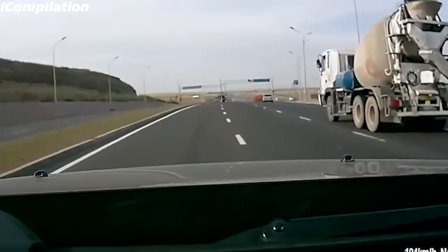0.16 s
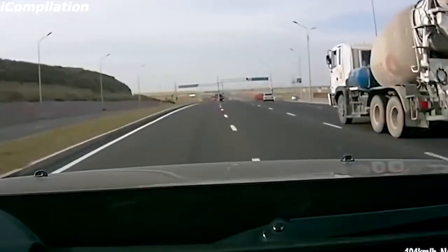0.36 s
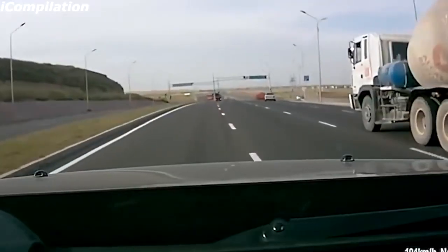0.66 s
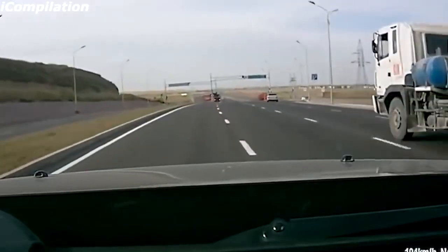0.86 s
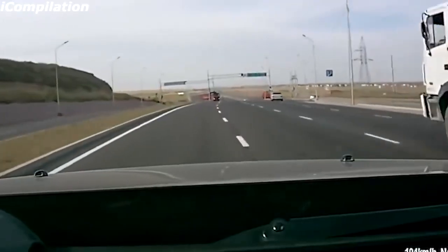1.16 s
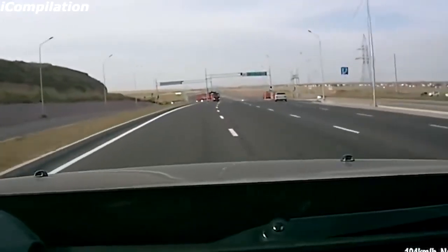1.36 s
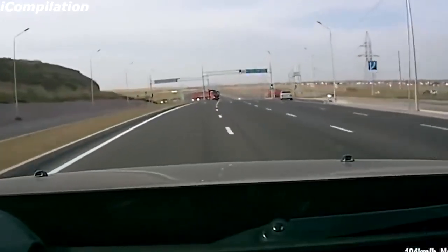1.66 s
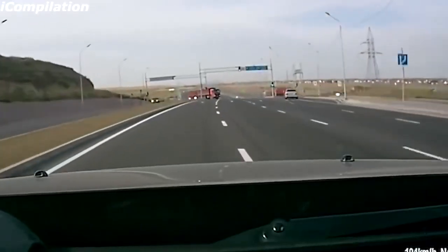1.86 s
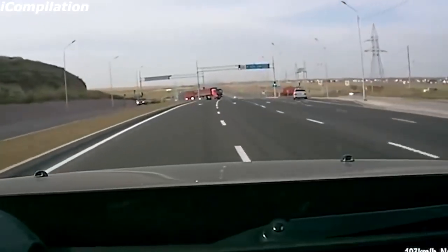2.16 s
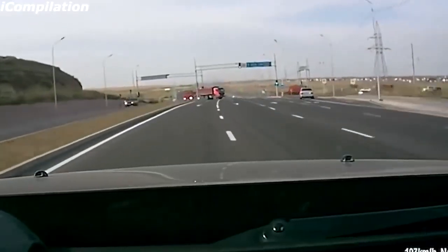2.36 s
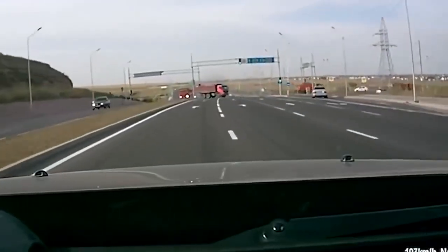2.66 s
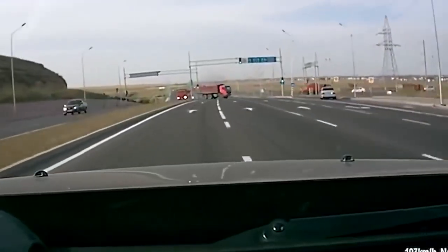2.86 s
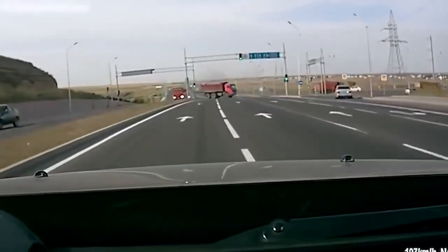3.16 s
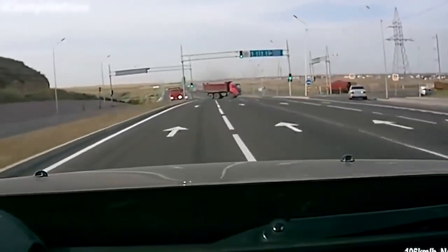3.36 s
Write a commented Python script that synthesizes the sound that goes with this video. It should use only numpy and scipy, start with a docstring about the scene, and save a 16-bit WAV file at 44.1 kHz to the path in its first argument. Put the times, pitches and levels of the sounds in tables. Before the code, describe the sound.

Wind buffets a fast car's cabin with a low, fluttering throb and tyre roar.

```python
"""Inside a car at highway speed. Air rushing past makes the cabin throb about fifteen times a second,
over a faint engine drone, the rumble of the body, the roar of the tyres and gusts of wind hiss.
The throb is a deep swinging tone; road and wind are bands of noise that pump in time with it.
It overloads a small recorder: the limiter ducks and the tallest swings are cut flat, so the noise
flutters."""
import sys
import numpy as np
from scipy import signal
from scipy.fft import rfft, irfft
from scipy.io import wavfile
from scipy.ndimage import uniform_filter1d

SR = 44100
rng = np.random.default_rng(int(sys.argv[2]) if len(sys.argv) > 2 else 0)


def generate_wav(signal):
    """Clip the signal to [-1, 1] and save it as 16-bit WAV at the path in sys.argv[1]."""
    frames = np.transpose(np.atleast_2d(signal))
    scaled = np.clip(frames, -1, 1) * 32767
    pcm = np.round(scaled).astype(np.int16)
    wavfile.write(sys.argv[1], SR, pcm)


N = 154350
T = np.arange(N) / SR

# slaps of air that swell one swing of the throb, with a brief rise or dip in the hiss just before:
# (time [s], swell [dB], swell width [s], rise or dip in the hiss [dB])
SLAPS = [(0.843, 6.5, 0.0048, 7), (0.938, 6.5, 0.0048, 2), (1.05, 6, 0.0041, 1), (1.083, 9, 0.0018, 6),
         (1.342, 9, 0.0033, 2), (1.3721, 14, 0.0022, 8), (1.419, 8, 0.0027, 8.5),
         (1.692, 10.5, 0.0043, 9.5), (1.719, 7, 0.0043, 6.5), (1.8218, 5, 0.0034, -4),
         (2.9345, 14.5, 0.003, 4), (3.066, 5, .0043, -7)]


def from_db(db):
    """Decibels to gain."""
    return 10 ** (np.asarray(db) / 20)


def rms_one(x):
    """Scale to unit rms."""
    return x / np.sqrt(np.mean(x ** 2) + 1e-20)


def in_time(rows):
    """An automation curve: (time [s], value) rows joined by straight lines."""
    return np.interp(T, *np.transpose(rows))


def pulses(times, heights, widths):
    """Smooth bumps at the given moments."""
    return sum(h * np.exp(-.5 * ((T - s) / w) ** 2) for s, h, w in zip(times, heights, widths))


def drift(rate_hz):
    """Smooth random wander of spread 1."""
    hop, run_in = 40, 2000
    pole = np.exp(-2 * np.pi * rate_hz * hop / SR)
    white = rng.standard_normal(N // hop + run_in + 2)
    slow = signal.lfilter([1], [1, -2 * pole, pole * pole], white)[run_in:]
    return np.interp(np.arange(N) / hop, np.arange(len(slow)), rms_one(slow))


def noise(spectrum):
    """Unit-rms noise with the given spectrum, falling steeply beyond its ends."""
    hz, db = np.transpose(spectrum)
    f = np.maximum(np.arange(N // 2 + 1) * SR / N, 1)
    skirts = np.minimum(f / hz[0], 1) ** 2 * np.minimum(hz[-1] / f, 1) ** 2
    colour = from_db(np.interp(np.log(f), np.log(hz), db))
    return rms_one(irfft(rfft(rng.standard_normal(N)) * skirts * colour, N))


def turbulent(spectrum, level_db, flutter_db, flutter_hz):
    """Coloured noise, evened out over 70 ms, riding a level curve with a flutter of its own."""
    x = noise(spectrum)
    steady = x / np.sqrt(uniform_filter1d(x ** 2, int(0.07 * SR)) + 1e-12)
    return steady * from_db(level_db + flutter_db * drift(flutter_hz))


def throb_angle():
    """Where the cabin air is in its swing, in radians."""
    # pace of the throb: (time [s], rate [Hz])
    throb_rate = [(0.0, 14.82), (0.2, 15.2), (0.4, 16.69), (0.55, 16.3), (0.7, 15.58), (0.85, 15.45),
                  (1.0, 13.26), (1.15, 15.27), (1.3, 15.73), (1.45, 15.96), (1.6, 13.84), (1.75, 13.96),
                  (1.9, 14.24), (2.05, 14.35), (2.2, 15.5), (2.4, 14.75), (2.6, 15.8), (2.75, 16.43),
                  (2.9, 15.83), (3.1, 14.62), (3.3, 16.03), (3.5, 16.28)]
    return 2 * np.pi * np.cumsum(in_time(throb_rate)) / SR


def cabin_throb():
    """The cabin air swings as one large, slightly overdriven resonator."""
    # strength of the throb, collapsing where a gust breaks it up: (time [s], relative level [dB])
    throb_level = [(0, -49), (.12, -28), (.24, -21.5), (.35, -27), (.46, -19.5), (.6, -17.5), (.68, -26),
                   (.79, -20), (1.15, -17), (1.3, -20), (1.48, -16), (1.53, -29), (1.62, -23),
                   (1.69, -18.5), (1.9, -17), (2.05, -20.5), (2.55, -17), (3.0, -16.5), (3.33, -16),
                   (3.45, -32)]
    trim_db, third_harmonic_db = -0.16, -27
    angle = throb_angle()
    times, swell_db, widths, _ = np.transpose(SLAPS)
    swing = np.sqrt(2) * (np.sin(angle) - from_db(third_harmonic_db) * np.cos(3 * angle))
    return swing * from_db(in_time(throb_level) + trim_db + pulses(times, swell_db, widths))


def engine(firing_hz=78.44, wander_hz=0.5, level_db=-38.5):
    """A faint, nearly steady firing drone."""
    hz = firing_hz + wander_hz * drift(0.61)
    return from_db(level_db) * np.sqrt(2) * np.sin(2 * np.pi * np.cumsum(hz) / SR)


def body_rumble(trim_db=3.5, gust_share=0.15):
    """The car body rumbles deep down, nudged by the gusts."""
    # colour of the rumble: (frequency [Hz], relative level [dB])
    rumble_spectrum = [(8, -17.5), (24, -5), (33, -2.5), (38, -4), (48, 3), (60, -10), (85, -13.5),
                       (120, -17.5), (200, -33)]
    # swells of the rumble: (time [s], relative level [dB])
    rumble_level = [(0, -35), (0.26, -32.5), (0.33, -23), (0.45, -23.5), (0.5, -27.5), (0.58, -29),
                    (0.64, -26.5), (0.75, -24), (0.95, -29.5), (1.1, -23), (1.2, -33.5), (1.35, -26.5),
                    (1.48, -29), (1.55, -20.5), (1.64, -25.5), (1.76, -30.5), (1.96, -30.5), (2.03, -26),
                    (2.45, -28.5), (2.9, -31), (3.15, -31), (3.32, -32.5), (3.39, -24.5), (3.5, -29.5)]
    roar_gust_db, _, _ = gusts_db()
    level_db = in_time(rumble_level) + gust_share * roar_gust_db + trim_db
    return turbulent(rumble_spectrum, level_db, flutter_db=1.3, flutter_hz=35)


def tyres(roar_trim_db=1.5, tread_trim_db=-6.5):
    """Tyres roar on the road, and the tread's band near 1 kHz follows most of each swell."""
    # colour of the road roar: (frequency [Hz], relative level [dB])
    roar_spectrum = [(80, -10), (130, -2.5), (165, 0), (200, 1.5), (290, -0.5), (350, -6.5), (420, -8.5),
                     (480, -7.5), (630, -13), (780, -27.5), (1400, -27), (3000, -38)]
    # colour of the tread: (frequency [Hz], relative level [dB])
    tread_spectrum = [(600, -24), (790, -9.5), (870, -2), (970, 1), (1035, -1), (1105, 2.5), (1200, -4),
                      (1310, -5), (1500, -14.5), (2200, -24.5), (4000, -49)]
    # swells of the road and air roar: (time [s], relative level [dB])
    roar_level = [(0, -45), (0.18, -37.5), (0.28, -41.5), (0.35, -32), (0.46, -38.5), (0.54, -33.5),
                  (0.65, -36.5), (0.7, -33.5), (0.79, -31.5), (0.88, -37.5), (1.0, -36.5), (1.1, -35.5),
                  (1.2, -36.5), (1.48, -35.5), (1.53, -33.5), (1.62, -30.5), (1.71, -38.5), (1.82, -34),
                  (2.02, -35.5), (2.07, -29), (2.22, -36.5), (2.46, -34.5), (2.56, -35.5), (2.66, -39),
                  (2.82, -36), (2.92, -40.5), (3.17, -40.5), (3.33, -34.5), (3.44, -31), (3.5, -31.5)]
    follow_share, pivot_db = 0.84, -33
    roar_db = in_time(roar_level)
    roar_gust_db, tread_gust_db, _ = gusts_db()
    roar = turbulent(roar_spectrum, roar_db + roar_gust_db + roar_trim_db, flutter_db=0.8, flutter_hz=28)
    tread_db = pivot_db + follow_share * (roar_db - pivot_db) + tread_gust_db
    tread = turbulent(tread_spectrum, tread_db + tread_trim_db, flutter_db=1.43, flutter_hz=7.2)
    return roar + tread


def wind(rush_trim_db=11, hiss_trim_db=1):
    """Air tears past the windows as a rush and a thin hiss; both briefly rise or dip before a slap."""
    # colour of the rush: (frequency [Hz], relative level [dB])
    rush_spectrum = [(600, 7.5), (1400, -3), (1600, -4), (1800, 2.5), (2050, -2), (2250, 0), (2500, -4),
                     (2850, -4), (3300, -8.5), (3800, -26.5), (6000, -65)]
    # colour of the hiss: (frequency [Hz], relative level [dB])
    hiss_spectrum = [(1500, 0.5), (3600, -1.5), (4900, 0.5), (5500, 3.5), (6050, 1.5), (6800, -1.5),
                     (8500, 1.5), (10000, -1), (12200, -7), (13500, -15), (14500, -27), (16000, -27)]
    # swells of the airflow: (time [s], relative level [dB])
    flow_level = [(0, -69), (0.27, -65.5), (0.35, -60.5), (0.46, -64), (0.64, -60), (0.7, -60), (0.81, -59),
                  (0.87, -63), (1.1, -61), (1.46, -62.5), (1.6, -57), (1.71, -63.5), (1.83, -58),
                  (2.0, -56.5), (2.09, -49.5), (2.16, -52), (2.22, -54), (2.46, -55.5), (2.56, -58.5),
                  (2.83, -60), (2.92, -64), (3.17, -63), (3.34, -60), (3.45, -56.5), (3.5, -59)]
    flick_lead_s, flick_width_s, rush_flick_scale = 0.0067, 0.0025, 1.68
    times, _, _, flick_heights = np.transpose(SLAPS)
    flicks_db = pulses(times - flick_lead_s, flick_heights, np.full(len(times), flick_width_s))
    _, _, wind_gust_db = gusts_db()
    flow_db = in_time(flow_level) + wind_gust_db
    rush_db = flow_db + rush_flick_scale * flicks_db + rush_trim_db
    rush = turbulent(rush_spectrum, rush_db, flutter_db=1.24, flutter_hz=18)
    hiss = turbulent(hiss_spectrum, flow_db + flicks_db + hiss_trim_db, flutter_db=1.6, flutter_hz=7)
    return rush + hiss


def buffeting(flutter_db=1.14, flutter_hz=38):
    """Gain on the noise: fast turbulence, and a pump twice per throb, swelling as each swing builds."""
    # how deeply the noise pumps: (time [s], depth [dB])
    pump_depth = [(0, 2.3), (.75, 0.7), (.9, 1.5), (1.45, 1), (1.55, 0.8), (1.72, 1.4), (2.1, 0.95),
                  (2.5, 2.1), (2.9, 2.7), (3.3, 2.2), (3.45, -0.5)]
    pump_db = in_time(pump_depth) * np.sin(2 * throb_angle())
    return from_db(flutter_db * drift(flutter_hz) + pump_db)


def gusts_db(attack_s=0.0064):
    """Sudden gusts hit the car and die away, pushing the levels of roar, tread and wind."""
    # gusts, each push scaled by its envelope: (time [s], roar [dB], tread [dB], wind [dB], decay [s])
    gusts = [(0.345, -1.5, 5, 1.5, 0.045), (0.676, 9, 13.5, 7.5, 0.025), (0.817, 5.5, -5, 2.5, 0.016),
             (1.091, 10, 5, 8, 0.014), (1.4, 20.5, 9.5, 9.5, 0.017), (1.461, 17, 12, 18, 0.0088),
             (1.510, 8.5, -0.5, 7.5, .028), (1.581, 3, 8.5, 3, 0.036), (1.623, 3.5, -4.5, 1, 0.034),
             (1.807, 9, 2.5, 10.5, 0.018), (2.05, 8, -2, 4.5, 0.019), (2.082, 3, 8.5, 1.5, 0.04),
             (2.254, 9, 5, 3, 0.06), (2.434, 3.5, 10.5, 3, 0.027), (3.257, 13, 2, 6, 0.0096),
             (3.372, 7, -4, -3, 0.018)]
    pushes_db = 0
    for start, *push_db, decay_s in gusts:
        age = np.maximum(T - start, 0)
        envelope = np.minimum(age / attack_s, 1) * np.exp(-age / decay_s)
        pushes_db = pushes_db + np.outer(push_db, envelope)
    return pushes_db


def limiter(x, threshold_db=-14.5, range_db=5.5, duck_share=0.54):
    """The gain ducks by a share of each tall swing's overshoot and creeps back before the next."""
    attack_s, overshoot_fall_db_per_s = 0.0018, 92
    overshoot_db = np.clip(20 * np.log10(np.abs(x) + 1e-9) - threshold_db, 0, range_db)
    fall_db = overshoot_fall_db_per_s * T
    held_db = np.maximum.accumulate(overshoot_db + fall_db, axis=-1) - fall_db
    pole = np.exp(-1 / (attack_s * SR))
    smoothed_db = signal.lfilter([1 - pole], [1, -pole], held_db)
    return x * from_db(-duck_share * smoothed_db)


def scene():
    """The mono mix at the windscreen: throb and drone with the buffeted road and wind."""
    buffet = buffeting()
    return (cabin_throb() + engine() + buffet * (body_rumble() + tyres() + wind()))[None]


def record(dry):
    """Overload: the limiter pumps, peaks clip flat with a narrow knee, and the top treble is cut."""
    ceiling, knee_hardness, cutoff_hz = 0.228, 40, 15700
    limited = limiter(dry)
    clipped = limited / (1 + (limited / ceiling) ** knee_hardness) ** (1 / knee_hardness)
    lowpass = signal.ellip(10, .1, 80, cutoff_hz, fs=SR, output="sos")
    return signal.sosfilt(lowpass, clipped)


dry = scene()
out = record(dry)
generate_wav(out)
```